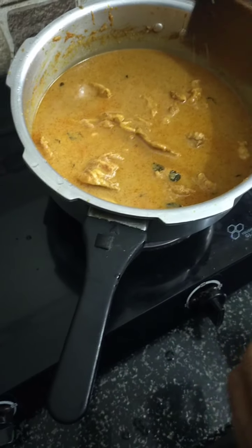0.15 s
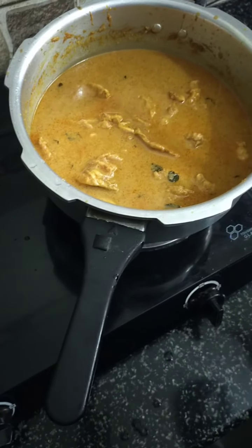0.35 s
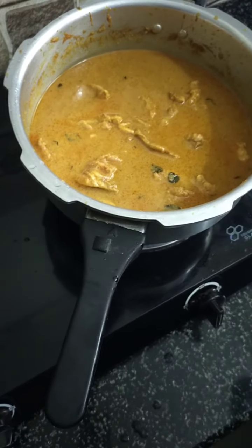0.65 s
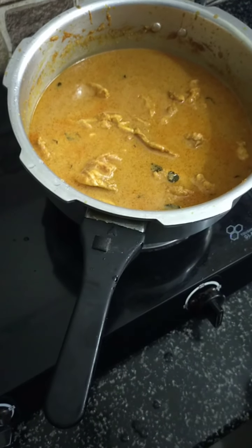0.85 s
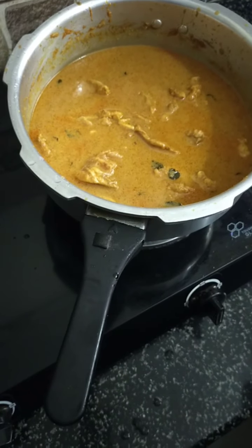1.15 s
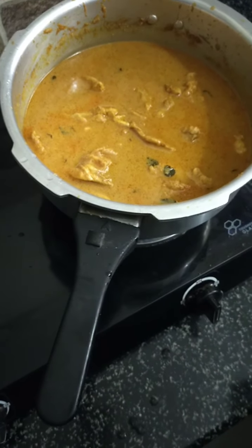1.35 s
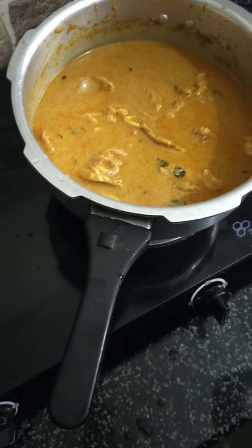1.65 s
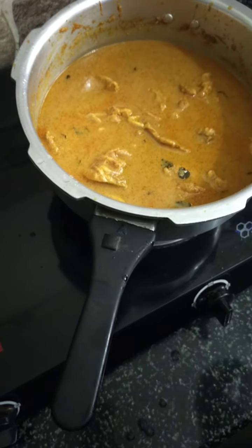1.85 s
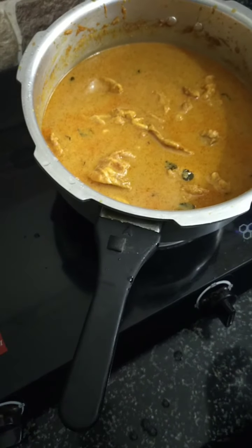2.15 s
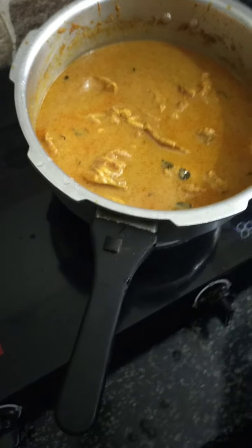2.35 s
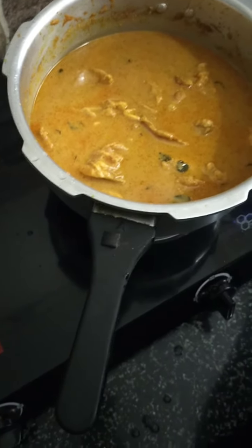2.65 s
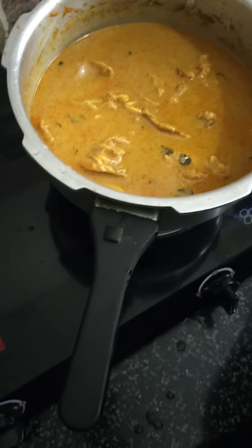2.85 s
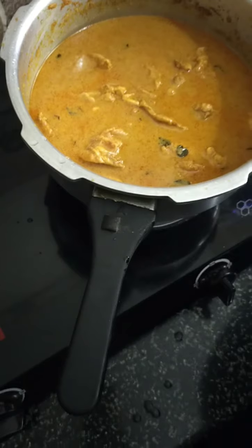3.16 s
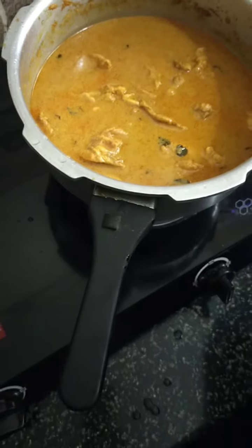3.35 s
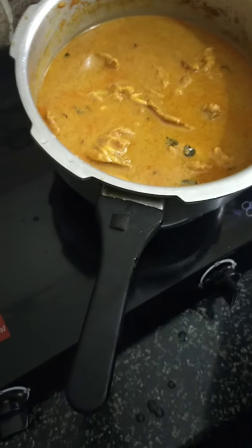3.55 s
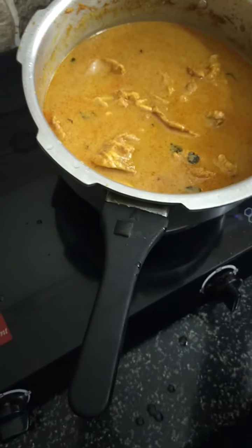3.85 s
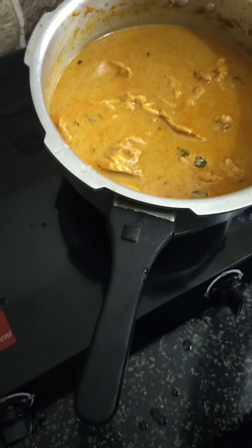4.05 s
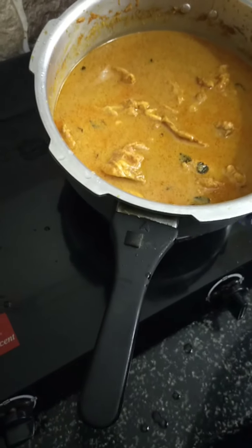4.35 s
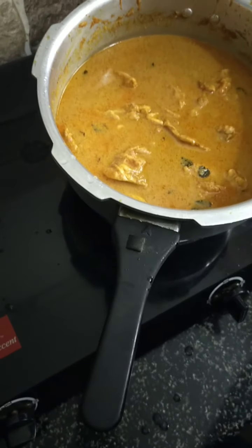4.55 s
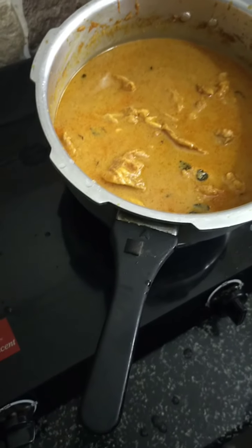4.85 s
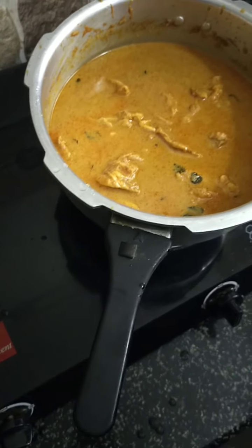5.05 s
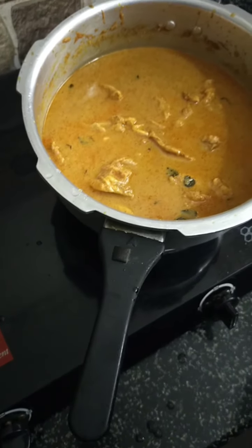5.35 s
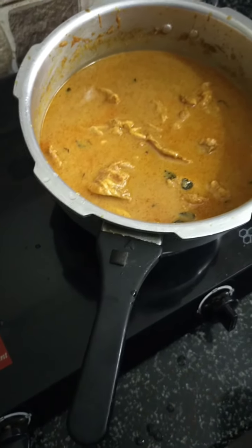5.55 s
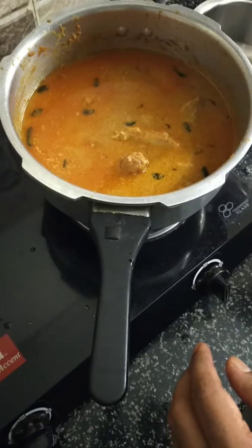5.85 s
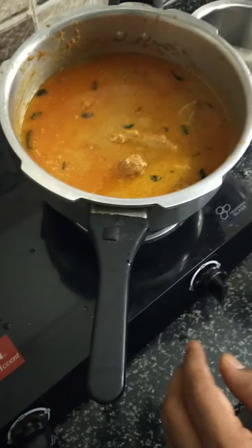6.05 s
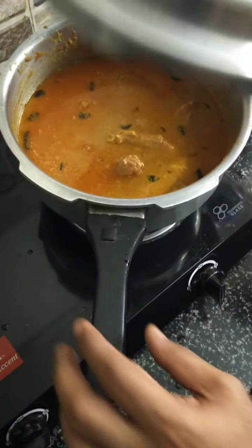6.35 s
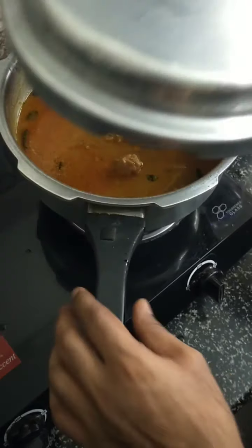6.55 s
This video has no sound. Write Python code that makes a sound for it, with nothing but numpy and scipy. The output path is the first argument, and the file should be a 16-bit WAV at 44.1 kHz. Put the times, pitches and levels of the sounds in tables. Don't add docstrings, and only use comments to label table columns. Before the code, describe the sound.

Over a soft fan-like hush, pans and a pressure-cooker lid crack, clink and clatter separately, then a hand thuds and rubs close by.

```python
import sys
import numpy as np
from scipy import signal
from scipy.fft import rfft, irfft
from scipy.io import wavfile
from scipy.ndimage import uniform_filter1d

SR = 44100
rng = np.random.default_rng(int(sys.argv[2]) if len(sys.argv) > 2 else 0)


def amplitude_ratio(level_db):
    exponent = np.asarray(level_db, float) / 20
    return 10 ** exponent


def pcm_store(signal):
    levels = np.round(np.clip(np.atleast_2d(signal), -1, 1) * 32767)
    wavfile.write(sys.argv[1], SR, levels.astype(np.int16).T)


N = 295029

# (time [s], peak level [dB], clatter t60 [s], ring over clatter [dB])
KNOCK_A = [
    (1.106, -18.5, 0.19, -5.5),
]
KNOCK_B = [
    (1.286, -16, 0.14, -12),
    (1.309, -20, 0.19, -6.5),
]
SLAM = [
    (2.3533, -14.5, 0.046, -13),
    (2.3555, -8, 0.45, -4.5),
]
TAP = [
    (2.759, -48, 1, -29),
    (2.83, -50, 0.54, -21),
    (2.904, -30, 0.25, 1),
    (2.938, -34.5, 0.096, -7),
    (3.05, -44.5, 0.25, -15),
]
LID = [
    (3.685, -11, 0.3, 4.5),
    (3.697, -21, 0.11, -20),
    (3.726, -19.5, 0.12, -20),
    (3.761, -29, 0.1, -22),
]
LID_BOUNCE = [
    (3.843, -20.5, 0.18, -2.5),
]
RIM = [
    (3.606, -36.5, 0.23, 8.9),
    (3.624, -35, 0.97, 6.1),
]
POT = [
    (5.072, -12.5, 0.17, -5),
    (5.085, -9.5, 0.19, 2),
    (5.112, -16, 0.12, -16),
    (5.224, -35, 0.41, -14),
]
NUDGE = [
    (2.256, -41, 0.21, -16),
    (2.289, -43, 0.31, -15),
    (2.314, -45, 0.33, -18),
    (4.742, -51, 0.31, 3),
    (4.881, -45.5, 0.2, -1),
    (4.908, -44, 0.25, 1),
    (5.682, -49.5, 0.66, -5.5),
]
CLOSE = [
    (6.617, -43.5, 0.15, 12),
    (6.654, -32.5, 0.084, -9),
]
FLICK = [
    (1.6327, -53, 0.3, -30),
    (1.6694, -55, 0.43, -30),
    (1.7144, -53.5, 0.18, -28),
    (1.8502, -54, 0.12, -30),
]
RIM_TICK = [
    (4.0815, -32.5, 0.32, 5.7),
]
VALVE = [
    (2.9043, -49, 0.69, 5),
    (3.6854, -24.5, 0.26, -6.5),
    (3.696, -26, 0.15, 4),
    (3.8482, -34.5, 0.34, 3.5),
    (5.0873, -33, 0.38, -2),
]
JINGLE = [
    (2.362, -26, 0.41, -8),
]
RIM_TAP = [
    (4.137, -19.5, 0.26, 5),
]
SHIVER = [
    (2.385, -33, 0.3, -8),
]

# (frequency [Hz], level [dB], t60 [s])
POT_MODES = [(869.6, 0.5, 0.35), (991, -17, 0.43), (1236, 2.5, 0.25), (1315, -17, .3), (1392, -5, 0.36),
             (1475, -6, 0.24), (1825, -13, 0.37), (1875, -2, 0.56), (2300, -9, 0.2), (3170, -9, 0.13),
             (3736, -15.5, 0.27), (5330, -25, 0.14), (6100, -27, 0.17), (15200, -30, .1)]
LID_MODES = [(935, -12, 0.22), (1235, 2, 0.81), (1309, -1, 0.6), (1665, -10, 0.098), (1985, -5, 1),
             (2290, -9.5, 0.56), (3350, -7.5, 0.33), (3800, -17, 0.37), (5460, -22, 0.46),
             (6160, -16.5, 0.25)]
PAN_MODES = [(371, -10, 0.29), (805, 3, 0.12), (860, -1, 0.14), (976, -3, 0.4), (1210, -6, 0.2),
             (1523, -12, 0.52), (1600, -8, 0.62), (1685, -10.5, 0.66), (2075, -11, 0.8), (610, 2, 0.088),
             (2364, -8, 0.88), (3150, -8, 0.49), (3725, -9.5, 0.17), (5280, -20, 0.33)]

# (frequency [Hz], level [dB], t60 [s])
CUP = (KNOCK_A, [(120, -44), (200, -26), (500, -26.5), (620, 0.5), (900, -1.5), (1250, -6.5), (2000, -8.5),
       (2600, -9), (2900, -19), (3300, -4), (3900, -11.5), (4400, -22), (5040, -27.5), (7680, -23.5),
       (16000, -41)], [(655, -2, 0.11), (757, 7, 0.1), (910, -4, 0.1), (1430, -12, 0.12), (2000, -3, 0.071),
       (2500, -4, 0.066), (3330, -1, 0.14)])
BOWL = (KNOCK_B, [(59, -67), (100, -29), (373, -20.5), (872, 1.5), (970, -7), (1450, -5), (1550, -6.5),
        (2080, -2.5), (3190, -18), (3620, -14), (4200, -26), (4600, -26.5), (6020, -32.5), (8460, -32.5),
        (16000, -42)], [(634, -1, 0.11), (1194, -10, 0.22), (1440, -4, 0.32), (1840, -14, 0.22),
        (2476, -10, 0.12), (3610, -4.5, 0.12), (4130, -12, 0.19)])
PAN = (SLAM, [(47, -50), (80, -33), (205, -16.5), (255, -5.5), (575, -14.5), (615, -10), (958, 1),
       (1120, -3), (1200, -1), (1820, -5.5), (2270, -3), (2840, -15), (3240, -10.5), (6590, -36.5),
       (12800, -26), (16000, -44)], PAN_MODES)
PAN_EDGE = (TAP, [(180, -64), (300, -13), (930, -4), (1120, -4), (1230, -7), (1390, -5), (2280, -1),
            (2740, -15), (3130, -9.5), (4100, -20.5), (4700, -20), (5600, -24), (9390, -19.5),
            (16000, -43)], [(1126, -16.5, 5.0), (1390, -11, 0.28), (1650, -14, 5.0), (3150, 2, 0.062),
            (3730, -26, 0.34)])
LID_DOME = (LID, [(120, -87.5), (200, -65), (245, -64), (800, -24), (945, -19), (1040, -27), (1270, -2),
            (1500, -12.5), (1940, -17), (2800, -24), (3190, -11.5), (4350, -32.5), (9400, -44),
            (14100, -33), (16000, -53)], LID_MODES)
LID_TILTED = (LID_BOUNCE, [(240, -77), (400, -53), (879, -21.5), (1400, 1), (1530, -26), (1680, -12),
              (2400, -8.5), (2710, -26.5), (3120, -11), (4510, -36.5), (7990, -36), (9320, -27),
              (16000, -29)], [(1374, 4, 0.19), (1693, -7, 0.43), (2430, -27, 0.22), (3030, -11, 0.15),
              (5160, -19, 0.13), (6150, -20, 0.18), (9300, -14, 0.1), (9900, -20, 0.1)])
LID_RIM = (RIM, [(290, -74), (500, -55.5), (773, -34), (946, -16), (1260, 0), (1380, -10), (1600, -8),
           (2850, -14), (3250, -21), (4210, -35), (4600, -36), (5310, -31.5), (16000, -52)],
           [(1395, 17, 0.14), (3160, -17, 0.21), (3650, -37, 0.16), (3940, -24, 0.053)])
LID_LUG = (RIM_TICK, [(290, -68), (500, -39), (640, -28), (1210, -21), (1400, -5), (1620, -30), (2570, -21),
           (3250, -19), (4470, -35), (6230, -28), (16000, -49)], [(1403, -1, 0.29), (3100, -2, 0.076),
           (5200, -24, .2), (6150, -20, .15), (9550, -27, .2)])
WEIGHT = (VALVE, [(3820, -11), (6500, -8.5), (8120, -13), (8950, 3.5), (9550, -1.5), (11000, -8),
          (11500, -14), (12500, -7), (14200, -21), (16000, -78)], [(9200, 4, 0.14), (9820, -1, 0.28),
          (9200, -2, 0.11)])
SPOON = (JINGLE, [(4120, -9.5), (7000, -2.5), (7960, -5), (9460, 0), (11300, -15), (12200, -16),
         (13000, -9), (13900, -15), (14300, -17), (16000, -25)], [(6120, -9, .3), (7700, 2, .25),
         (7800, -3, .2), (8970, -3, 0.62), (10200, -4, .2)])
VESSEL = (POT, [(120, -78), (200, -38), (353, -27), (612, -31), (763, -17), (851, -4.5), (950, -15),
          (1230, 0.5), (1680, -3), (1840, 4.5), (2560, -22), (3190, -11), (4430, -34.5), (9060, -33),
          (16000, -37)], POT_MODES)
BASE = (NUDGE, [(180, -59), (300, -9.5), (556, -13.5), (1400, -4), (1820, -11.5), (3000, -18.5),
        (5640, -33), (8640, -27), (10000, -29), (13000, -58), (22000, -120)], [(890, -20, 5.0),
        (1267, -12, 0.065), (2000, -23, 5.0)])
HELD_LID = (CLOSE, [(180, -35), (300, 4.5), (1190, -16), (1870, -9), (3030, -18), (3520, -24), (7080, -51),
            (8640, -31), (9390, -43), (16000, -44)], [(1852, 2, 0.35), (2210, 3, 0.038)])
FOIL = (FLICK, [(4000, -34), (6500, -4), (8500, 8), (11000, 0), (15000, 5), (16000, 1.5)], [(8540, 0, .05)])
LADLE = (SHIVER, [(9000, -40), (11300, -25), (11900, -9), (12600, 2), (13200, -1), (14000, -18),
         (16000, -25)], [(12600, 0, .2), (13100, -2, .2)])
LID_LIP = (RIM_TAP, [(290, -70), (500, -55.5), (773, -22), (946, -10), (1380, 2.5), (1600, -16),
           (2850, -16), (3250, -13), (4300, -22.5), (4700, -32), (5310, -26), (7200, -42), (9000, -37),
           (16000, -54)], [(1396, 23, 0.085), (1250, -1, 0.18), (3200, 1.5, 0.19), (4040, -2, 0.12),
           (5330, -13, .15), (6150, -18, .15), (8900, -24, .1)])
PIECES = [CUP, BOWL, PAN, PAN_EDGE, LID_DOME, LID_TILTED, LID_RIM, LID_LUG,
          WEIGHT, SPOON, VESSEL, BASE, HELD_LID, FOIL, LADLE, LID_LIP]

# (chatter [s], grip that damps modes [s], waver share [1])
HOLDS = [(0.0044, 0.026, 0.64), (0.00345, 0.017, 0.93), (0.0023, 0.16, 0.56), (0.0034, 0.067, 0.72),
         (0.00336, 0.075, 0.71), (.006, 0.036, 0.41), (0.0071, 0.028, 0.48), (0.0035, 0.027, 0.23),
         (0.0053, 0.041, 0.76), (0.0091, 0.14, .6), (0.017, 0.32, 0.7), (0.005, 0.029, 0.76),
         (0.00336, 0.033, 1.2), (0.021, .05, .5), (.012, .08, .6), (0.0058, 0.078, 0.44)]

# (frequency [Hz], t60 [s])
ROOM_T60 = [(200, 0.14), (1000, 0.59), (3000, 0.67), (8000, 0.71), (15000, 0.37)]

# (start [s], hold [s], rustle level [dB], thud over rustle [dB])
STROKES = [
    (6.233, 0.047, -55.5, -9.5),
    (6.356, 0.027, -52.5, 11),
    (6.45, 0.052, -56, 8.5),
    (6.54, 0.027, -76, 6),
    (6.627, 0.016, -54.5, 10),
]
# (frequency [Hz], density [dB per Hz])
THUD = [(41, -41), (70, -6), (87, -3), (140, 5), (188, -25), (259, -1.5), (308, -31), (366, -10.5),
        (410, -29), (500, -14), (650, -65), (1100, -120)]
RUSTLE = [(180, -26), (300, -3), (562, -10), (655, -3.5), (910, -6.5), (1040, -3), (1280, -8.5),
          (2300, -9.5), (3500, -27.5), (4550, -59), (7700, -120)]
SKIN = [(2060, -35), (3500, -5), (3730, -5), (4870, -3), (6740, -4), (8420, 0), (9870, -6), (16000, -12)]
# (time [s], level [dB])
NEAR = [(6.2, -80), (6.3, -56), (6.37, -42), (6.46, -37), (6.55, -39), (6.62, -41), (6.69, -38)]
# (frequency [Hz], density [dB per Hz])
PUSH = [(3, -14), (10, 14), (24, -5), (42, 3.0), (62, -16.0), (90, -12), (200, -66)]

# (start [s], hold [s], level [dB])
HUM = [
    (0.94, .17, -66.5),
    (1.347, 0.13, -75.5),
    (1.58, 0.2, -72),
]
# (frequency [Hz], density [dB per Hz])
HUSH = [(9, -42), (15, 5.5), (43, -16), (138, -15.5), (174, -21.5), (247, -18.5), (420, -24), (575, -25),
        (970, -23.5), (2140, -21.5), (2600, -25.5), (3100, -34.5), (4700, -40.5), (16000, -36)]
# (frequency [Hz], gain [dB])
HOUSING = [(4000, 2.5), (5400, 0.5), (6900, -2.5), (8000, 1.5), (9200, 1.5), (10600, -2), (12500, 0.5),
           (14000, -1), (15600, 3), (15950, -28)]
# (frequency [Hz], side over mid [dB])
APART = [(3700, -80), (4400, -7), (5500, -2), (9000, -7), (15000, -1)]


def evened(x):
    return x / np.sqrt(np.mean(x ** 2) + 1e-20)


def smoothed(shape, size, axis=-1):
    return uniform_filter1d(rng.standard_normal(shape), size=size, axis=axis)


def read(points, hz):
    f, value = np.transpose(points)
    return np.interp(np.log(hz + 1), np.log(f + 1), value)


def add(mix, start_s, sound):
    part = mix[round(start_s * SR):][:len(sound)]
    part += sound[:len(part)]


def colour(points, size=2048):
    hz = abs(np.fft.fftfreq(2 * size, 1 / SR))
    log_gain = np.log(amplitude_ratio(read(points, hz)))
    phase = -signal.hilbert(log_gain).imag
    return np.fft.ifft(np.exp(log_gain + 1j * phase)).real[:size]


def noise(points, count):
    gain = amplitude_ratio(read(points, np.fft.rfftfreq(count, 1 / SR)))
    return evened(irfft(rfft(rng.standard_normal(count)) * gain, count))


def follow(points):
    time_s, level_db = np.transpose(points)
    return amplitude_ratio(np.interp(np.arange(N) / SR, time_s, level_db, left=-150, right=-150))


def swell(start_s, hold_s, rise_s, fall_db_per_s):
    t = np.arange(N) / SR - start_s
    return np.clip(t / rise_s, 0, 1) * amplitude_ratio(-fall_db_per_s * np.maximum(t - rise_s - hold_s, 0))


def clatter(spectrum, rise, chatter_s, t60_s):
    count = len(rise)
    t = np.arange(count) / SR
    rocking = amplitude_ratio(1.3 * evened(smoothed(count, 160)))
    crack = 0.16 * amplitude_ratio(-60 * t / (0.0059 + 3 * chatter_s))
    shake = rise * (rocking * amplitude_ratio(-60 * t / t60_s) + crack) * rng.standard_normal(count)
    shake[round(chatter_s * SR / 2)] = 13 * .003 / max(chatter_s, .003)
    coloured = signal.fftconvolve(shake, colour(spectrum))[:count]
    streaks_db = 3.2 * evened(smoothed(count // 2 + 1, 30))
    streaks = np.c_[np.arange(len(streaks_db)) * 2., streaks_db]
    return signal.fftconvolve(coloured, colour(streaks))[:count]


def ringing(modes, rise, grip_s, waver_share):
    t = np.arange(len(rise)) / SR
    ring = np.zeros(len(t))
    for hz, mode_db, mode_t60_s in modes:
        a, b = rng.standard_normal((2, 300))
        knots_s = np.arange(len(a)) * 28 / hz
        waver = 1 + waver_share * np.interp(t, knots_s, a + 1j * b)
        fade = amplitude_ratio(mode_db - 60 * t / np.clip(mode_t60_s, .02, .6))
        ring += fade * (waver * np.exp(2j * np.pi * (hz * t + rng.random()))).real
    return ring * rise * amplitude_ratio(-260 * np.maximum(t - grip_s, 0))


def contact(piece, hold, peak_db, t60_s, ring_db):
    _, spectrum, modes = piece
    chatter_s, grip_s, waver_share = hold
    t = np.arange(SR // 2) / SR
    rise = np.minimum((t + 2e-4) / chatter_s, 1)
    ring = ringing(modes, rise, grip_s, waver_share)
    sound = evened(clatter(spectrum, rise, chatter_s, t60_s)) + amplitude_ratio(ring_db) * evened(ring)
    loudest = np.sqrt(uniform_filter1d(sound ** 2, size=200).max())
    return amplitude_ratio(peak_db - 9) * sound / loudest


def cookware():
    out = np.zeros(N)
    for piece, hold in zip(PIECES, HOLDS):
        for start_s, peak_db, t60_s, ring_db in piece[0]:
            add(out, start_s, contact(piece, hold, peak_db, t60_s, ring_db))
    return out


def room(x):
    taps = np.zeros(SR)
    at = np.arange(300, SR - 20, 20)
    taps[at + rng.integers(0, 20, len(at))] = rng.choice([-1., 1.], len(at))
    hz, t, z = signal.stft(taps, SR, nperseg=256)
    decay = amplitude_ratio(-60 * t / read(ROOM_T60, hz)[:, None])
    tail = signal.istft(z * decay, SR, nperseg=256)[1]
    return signal.fftconvolve(x, tail / np.linalg.norm(tail))[:N]


def hand():
    rise_s, rub_fall_db_per_s, thud_fall_db_per_s = 0.026, 158, 200
    skin_db, skin_follows = -51.5, .3
    thud = noise(THUD, N)
    grain = evened(amplitude_ratio(evened(smoothed(N, 300))))
    rustle = grain * noise(RUSTLE, N)
    skin = grain * noise(SKIN, N)
    out = noise(PUSH, N) * follow(NEAR)
    for start_s, hold_s, rustle_db, thud_db in STROKES:
        rub = swell(start_s, hold_s, rise_s, rub_fall_db_per_s)
        press = swell(start_s, hold_s, rise_s, thud_fall_db_per_s)
        out += rub * amplitude_ratio(rustle_db) * rustle
        out += rub * amplitude_ratio(skin_db + skin_follows * rustle_db) * skin
        out += press * amplitude_ratio(rustle_db + thud_db) * thud
    return out


def hum():
    hz = 252 + 3 * evened(smoothed(N, 3000))
    tone = np.sqrt(2) * np.sin(2 * np.pi * np.cumsum(hz) / SR)
    gain = np.zeros(N)
    for start_s, hold_s, level_db in HUM:
        gain += amplitude_ratio(level_db) * swell(start_s, hold_s, rise_s=0.021, fall_db_per_s=250)
    return tone * gain


def hush():
    level_db, patch_db, swell_db = -58, .8, .25
    _, t, z = signal.stft(noise(HUSH, N), SR, nperseg=512)
    patches = evened(uniform_filter1d(smoothed(z.shape, 8, axis=0), size=16, axis=1))
    swelling = evened(smoothed(len(t), 30))
    drift = amplitude_ratio(patch_db * patches + swell_db * swelling)
    return amplitude_ratio(level_db) * signal.istft(z * drift, SR, nperseg=512)[1][:N]


def scene():
    hits = cookware()
    mid = hits + amplitude_ratio(-19.0) * room(hits) + hand() + hum() + hush()
    return np.array([mid, mid])


def low_pass(x):
    return signal.sosfilt(signal.butter(12, 16810, fs=SR, output="sos"), x)


def record(dry):
    mid = signal.oaconvolve(dry.mean(0), colour(HOUSING))[:N]
    hz, t, z = signal.stft(mid, SR, nperseg=1024)
    scattered = rng.random((len(hz) // 16 + 1, len(t) // 3 + 1)) < .17
    scattered = np.repeat(scattered, 16, 0)[:len(hz)]
    scattered = np.repeat(scattered, 3, 1)[:, :len(t)]
    phase = np.exp(2j * np.pi * rng.random(z.shape))
    z = z * scattered * amplitude_ratio(read(APART, hz))[:, None] * phase
    side = signal.istft(z, SR, nperseg=1024)[1][:N]
    return low_pass(np.array([mid + side, mid - side]))


dry = scene()
out = record(dry)
pcm_store(out)
```